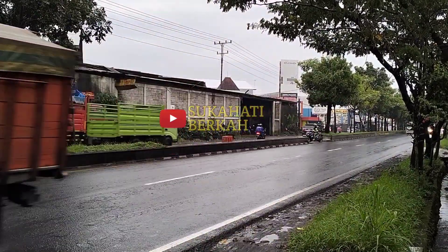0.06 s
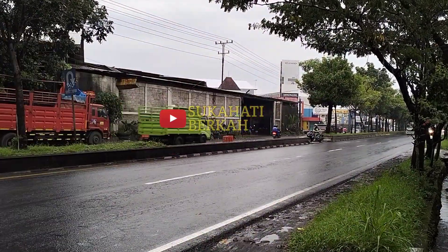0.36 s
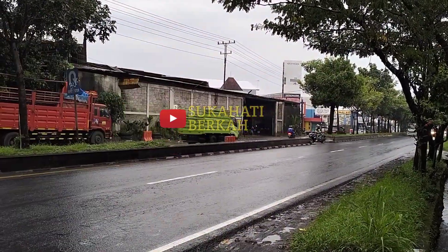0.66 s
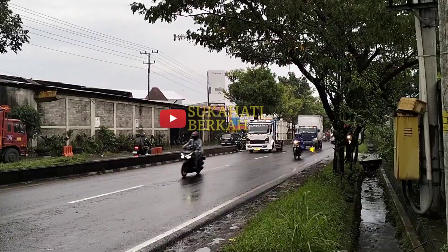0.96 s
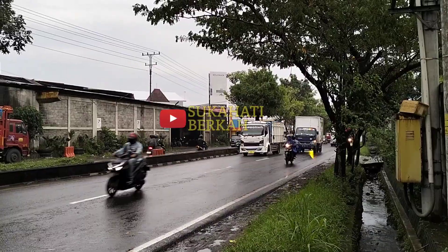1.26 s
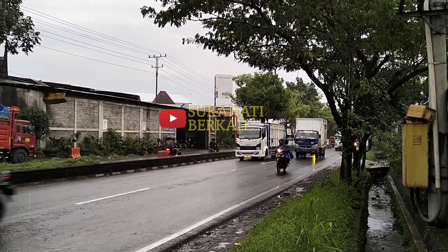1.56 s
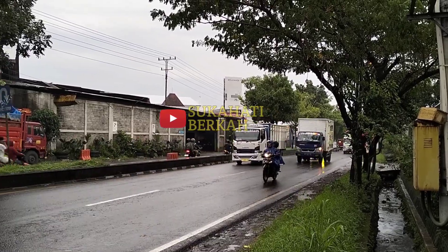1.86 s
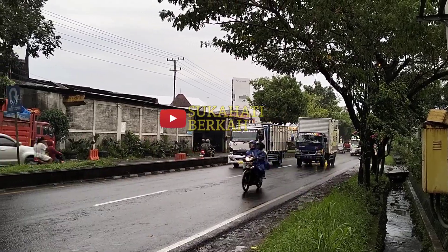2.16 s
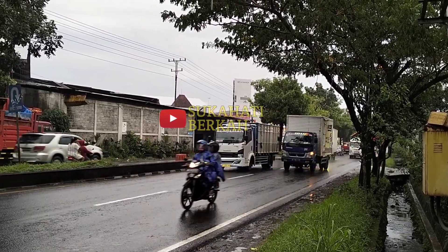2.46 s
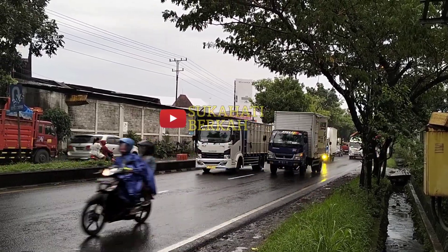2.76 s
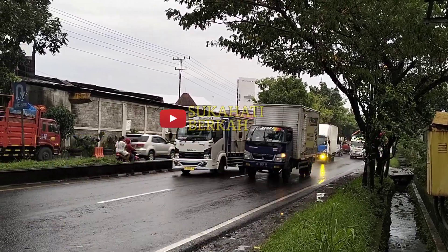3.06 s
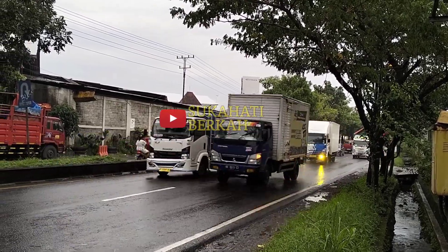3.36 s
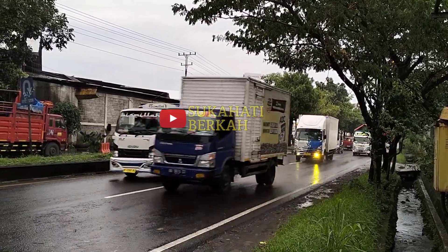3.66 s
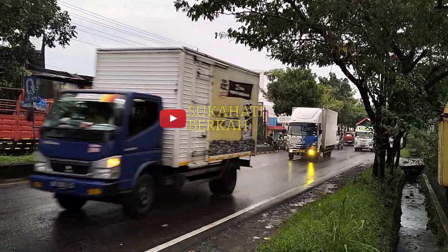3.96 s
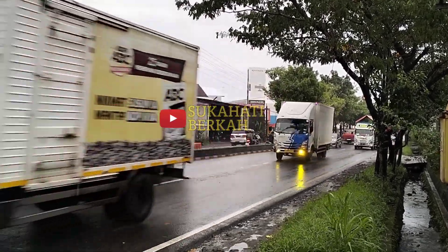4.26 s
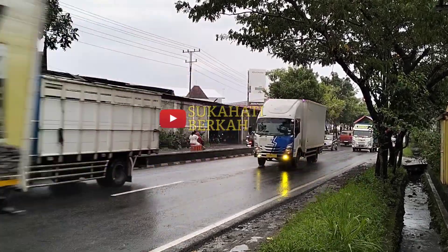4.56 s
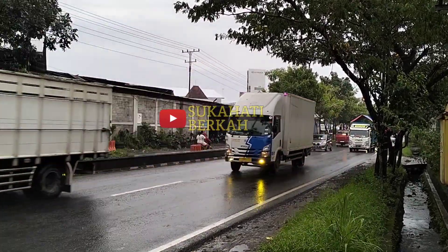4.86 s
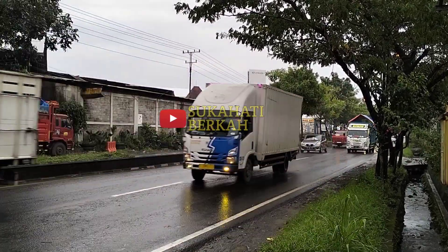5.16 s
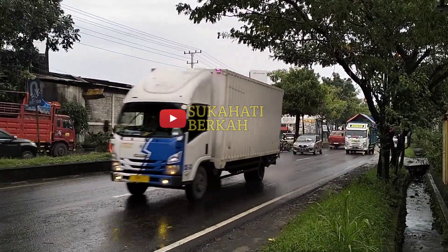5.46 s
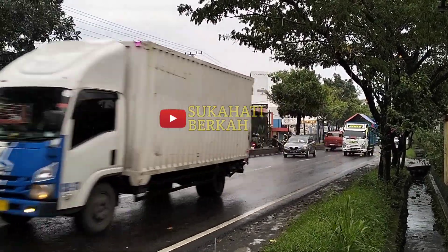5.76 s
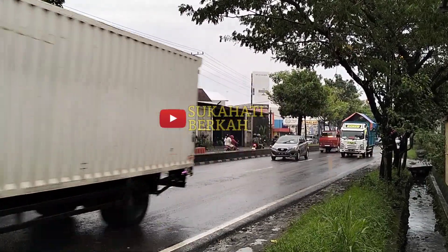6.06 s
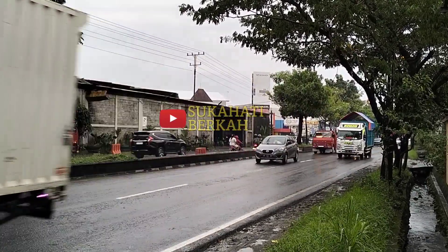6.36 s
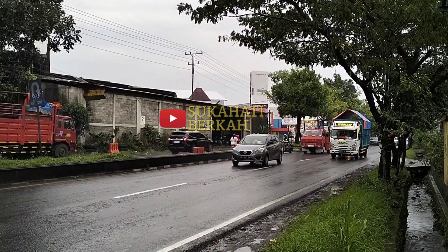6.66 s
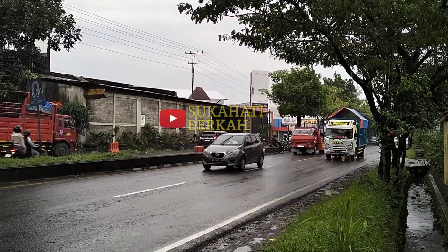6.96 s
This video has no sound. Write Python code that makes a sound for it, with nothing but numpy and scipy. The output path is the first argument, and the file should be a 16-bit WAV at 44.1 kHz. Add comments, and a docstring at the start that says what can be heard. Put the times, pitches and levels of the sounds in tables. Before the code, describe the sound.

A diesel truck draws away on a wet road, its engine throbbing under a gear whine and hissing spray. At 0.7 seconds the sound cuts to silence. Traffic returns at 1.2 seconds with a splash and sizzling tyres. Two motorbikes hum past at about 1.6 and 2.6 seconds, each dropping in pitch. Diesel trucks build beneath them and drone by from about 3 to 5 seconds, with engine clatter strongest near 4.1. Tyres rumble and roar, trailing hiss, spray and short puddle splashes. Another truck passes around 6 seconds, with a few soft wheel thuds until 6.5 and low puffs of air near 6.3 and 7. A thin, breathy high whistle, faint at first, grows from about 3.7 seconds, peaks near 6.3 and lasts to the end. Everything is heard close from the roadside, almost in mono, over steady distant traffic.

```python
"""Traffic on a wet road

Diesel trucks, motorbikes and cars pass close by, heard almost in mono from the verge.
Each swells and fades with its distance: first engine drone and tyre roar, then the hiss and spray
of the water it throws up. A thin, breathy whistle grows as the trucks go by.
One truck draws away at the start; half a second of silence separates it from the later traffic."""
import sys
import numpy as np
from scipy import signal
from scipy.fft import rfft, irfft, next_fast_len
from scipy.io import wavfile
from scipy.ndimage import uniform_filter1d, map_coordinates

SR = 44100
rng = np.random.default_rng(int(sys.argv[2]) if len(sys.argv) > 2 else 0)


def dump_mix(stems):
    """Bounce the given channels to the path in sys.argv[1] as a 16-bit WAV at rate SR."""
    frames = np.atleast_2d(stems).T  # one column per channel
    limited = np.clip(frames, -1, 1)  # hard clip at full scale
    pcm = np.round(limited * 32767).astype(np.int16)
    wavfile.write(sys.argv[1], SR, pcm)


N = 313110


def amp(db):
    """Turn decibels into a gain."""
    return 10 ** (np.asarray(db) / 20)


def unit(x):
    """Scale a signal to an average strength (rms) of 1."""
    return x / np.sqrt(np.mean(x ** 2) + 1e-20)


def clock():
    """The time of every sample, in seconds."""
    return np.arange(N) / SR


def curves(rows):
    """Join a table's rows over time: one smooth line for each later column."""
    times, *columns = np.transpose(rows)
    return [np.interp(clock(), times, column) for column in columns]


def along(points, hz):
    """Read a table of (frequency, level) on a log frequency axis."""
    freqs, levels = np.transpose(points)
    return np.interp(np.log(hz + 1), np.log(freqs), levels)


def wobble(rate):
    """A smooth random curve through `rate` new values a second."""
    knots = rng.standard_normal(int(N * rate / SR) + 4)
    at = np.arange(len(knots) * 10) / 10
    return np.interp(clock() * rate, at, map_coordinates(knots, [at], mode="nearest"))


def filtered(x, response):
    """Multiply each frequency in x by response(hz)."""
    size = next_fast_len(N + SR // 2)
    return irfft(rfft(x, size) * response(np.fft.rfftfreq(size, 1 / SR)), size)[..., :N]


def coloured(x, spectrum):
    """Give x the tone colour of a (frequency, level) table, at strength 1."""
    return unit(filtered(x, lambda hz: amp(along(spectrum, hz))))


def rush(spectrum, patchy_db):
    """Turbulent noise, louder and softer in random patches of time and frequency."""
    cells = signal.stft(rng.standard_normal(N), nperseg=512)[2]
    patches = uniform_filter1d(rng.standard_normal(cells.shape), size=6, axis=0)
    patches = unit(uniform_filter1d(patches, size=12, axis=1))
    noise = signal.istft(cells * amp(patchy_db * patches), nperseg=512)[1][:N]
    return coloured(noise, spectrum)


def water(spectrum, drops_per_s, drops_db, patchy_db):
    """A mist of noise with the ticks of single droplets in it."""
    ticks = (rng.random(N) < drops_per_s / SR) * rng.standard_normal(N)
    return unit(rush(spectrum, patchy_db) + amp(drops_db) * coloured(ticks, spectrum))


def drone(motion, harmonics, jitter, flutter_db):
    """Tones tied to one unevenly turning shaft; returns the sound and the shaft's phase."""
    hz, gain = motion
    phase = 2 * np.pi * np.cumsum(hz * (1 + jitter * wobble(25))) / SR
    tones = sum(amp(db + flutter_db * wobble(11)) * np.sin(multiple * phase + 2 * np.pi * rng.random())
                for multiple, db in harmonics)
    return np.sqrt(2) * gain * tones, phase


def knock(phase, depth):
    """A gain that peaks once a cycle, like an engine firing."""
    return unit(np.exp(depth * np.cos(phase)))


def nearness(at_s, half_s):
    """Gain of something going by: 1 when nearest at at_s, a half at half_s before or after."""
    return 1 / (1 + ((clock() - at_s) / half_s) ** 2)


def swell(at_s, half_s):
    """Gain of a brief bell-shaped surge."""
    return np.exp(-((clock() - at_s) / half_s) ** 2)


def power_sum(gains):
    """Joint gain of unrelated sounds: their powers add."""
    return np.sqrt(sum(gain ** 2 for gain in gains))


def running(track, fade_db_per_s=90):
    """Pitch and gain of an engine that follows its table and fades before and after it."""
    hz, db = curves(track)
    outside_s = np.abs(clock() - np.clip(clock(), track[0][0], track[-1][0]))
    return hz, amp(db - fade_db_per_s * outside_s)


def passing(at_s, half_s, db, hz, fall):
    """Pitch and gain of a tone going by: it slides from the share `fall` above hz to as far below."""
    return hz * (1 - fall * np.tanh((clock() - at_s) / half_s)), amp(db) * nearness(at_s, half_s)


# wheels bumping over the road, and air pushed at the listener: t/s, level/dB, half length/s
WHEEL_BUMPS = [(6.03, -31, .04), (6.14, -31, .03), (6.275, -28.5, 0.018), (6.43, -28.5, 0.061)]
AIR_GUSTS = [(6.28, -29.5, .06), (6.96, -31.5, .04)]
# their tone colours: f/Hz, level/dB
BUMP_TONE = [(30, -20.5), (60, 2), (130, 5.5), (260, 2), (420, -7), (700, -30)]
GUST_TONE = [(8, -24.5), (20, -1.5), (35, 0), (70, -17.5), (300, -70)]


def thuds(blows, tone):
    """Soft blows, each a short swell of deep noise."""
    gain = sum(amp(db) * swell(at_s, half_s) for at_s, db, half_s in blows)
    return gain * coloured(rng.standard_normal(N), tone)


# brief hums: nearest t/s, half passing time/s, level/dB, f/Hz
HUMS = [(1.94, 0.099, -22, 140), (1.95, .3, -40, 487.5), (2.05, 0.29, -27.5, 101.9),
        (2.419, 0.19, -27, 159.3), (3.25, 0.29, -28.5, 167.9), (4.5, 0.24, -34, 413),
        (4.81, .12, -30.5, 219.2), (5.68, .2, -32, 56), (5.85, .45, -37, 409.8), (5.85, 0.43, -39, 345.4)]


def running_gear():
    """Axles, treads, pipes and passing engines each hum for a moment as they go by."""
    return sum(drone(passing(*hum, fall=.006), [(1, 0)], jitter=.022, flutter_db=3)[0] for hum in HUMS)


def breathy_tone(pitch_hz, width_hz):
    """A resonance blown by rough air: the wider it is, the faster its strength and phase drift."""
    pole = np.exp(-2 * np.pi / 64)
    slow_noises = signal.lfilter([1], np.poly([pole] * 3), rng.standard_normal((2, N)))
    read_at = np.arange(1, N + 1) * width_hz / SR * 64
    cos_gain, sin_gain = (unit(np.interp(read_at, np.arange(N), noise)) for noise in slow_noises)
    phase = 2 * np.pi * np.cumsum(pitch_hz) / SR
    return cos_gain * np.cos(phase) + sin_gain * np.sin(phase)


# the whistle's path: t/s, f/Hz, level/dB
WHISTLE = [(1.2, 6554, -42), (2.2, 6500, -43), (2.6, 6160, -37), (3.45, 6197, -38), (3.68, 6560, -30),
           (3.95, 6750, -27), (4.2, 7260, -25), (4.52, 7400, -25.5), (4.86, 6884, -26), (5.6, 6900, -22),
           (5.85, 6890, -18), (6.15, 6930, -18), (6.3, 6950, -15), (6.5, 6930, -17), (6.62, 6800, -20.5),
           (6.85, 6550, -19.5), (7.1, 6710, -21)]
# its parts: pitch offset/Hz, half width/Hz, level/dB at reference_db, dB gained per dB of the path
WHISTLE_AIR = (-60, 470, -26, 1.0)
WHISTLE_CORE = (110, 230, -29.5, 0.9)
WHISTLE_OCTAVE = (260, 620, -37.5, 1.35)


def whistle(reference_db=-24, flutter_db=0.6):
    """A thin whistle, perhaps from a truck's exhaust pipe: a sharp core and its octave in airy noise."""
    hz, db = curves(WHISTLE)
    hz = hz * (1 + .003 * wobble(22))
    parts = [(hz, WHISTLE_AIR), (hz, WHISTLE_CORE), (2 * hz, WHISTLE_OCTAVE)]
    tone = 0
    for pitch_hz, (offset_hz, width_hz, part_db, growth) in parts:
        tone += amp(part_db + growth * (db - reference_db)) * breathy_tone(pitch_hz + offset_hz, width_hz)
    return amp(flutter_db * wobble(60)) * tone


# the first truck's wheels: t/s, roar level/dB, spray level/dB, water fan level/dB
LEAVING_LEVELS = [(0, -19, -20, -35), (.45, -20.5, -20.5, -26.5), (.72, -21.5, -21, -28)]
# tone colours of those three: f/Hz, level/dB
LEAVING_ROAR = [(20, -16), (45, -4), (80, 1), (150, 2), (260, -3.5), (310, -8), (410, -3.5), (530, -11),
                (680, -7.5), (800, -11), (1000, -6.5), (1700, -10), (2600, -15), (5000, -47.5)]
LEAVING_SPRAY = [(900, -43), (1600, -11), (2100, 0.5), (3100, 1.5), (4000, -5), (5500, -10.5), (7000, -12),
                 (9000, -18), (11000, -14.5), (13300, -11), (14500, -14), (15700, -23.5)]
WATER_FAN = [(1500, -30.5), (2500, -12), (3150, 6), (3800, -2.5), (5000, -22), (8000, -41.5)]
# its engine: t/s, f/Hz, level/dB
LEAVING_ENGINE = [(0, 64.75, -29), (.3, 63.55, -29), (.72, 62.3, -27.5)]
# its gear whine: multiple of the pitch, level/dB
GEAR_HARMONICS = [(1, 1), (3, -10), (4, -16), (5, -11.5), (9, -4.5)]


def leaving_truck(gear_hz=237, gear_db=-27.5):
    """A truck draws away: its engine throbs, its gears whine and water fans out behind its wheels."""
    roar_db, spray_db, fan_db = curves(LEAVING_LEVELS)
    engine, phase = drone(running(LEAVING_ENGINE), [(1, -1), (2, -5)], jitter=.0073, flutter_db=2)
    gear_gain = amp(gear_db) * swell(at_s=0.2, half_s=0.43)
    gears, _ = drone((gear_hz, gear_gain), GEAR_HARMONICS, jitter=.004, flutter_db=3.5)
    roar = amp(roar_db) * rush(LEAVING_ROAR, patchy_db=0.1) * knock(phase, depth=0.14)
    spray = amp(spray_db) * water(LEAVING_SPRAY, drops_per_s=2000, drops_db=-6.5, patchy_db=1)
    fan = amp(fan_db) * rush(WATER_FAN, patchy_db=3)
    return engine + gears + roar + spray + fan


# two bikes, and one bike's exhaust: nearest t/s, half passing time/s, level/dB, f/Hz, pitch fall/share
MOTORBIKES = [(1.57, .2, -21.5, 115.3, .11), (2.62, .45, -27, 124.4, .14)]
BIKE_EXHAUST = (1.63, 0.7, -36.5, 95, 0.2)
# the tones in each: multiple of the pitch, level/dB
BIKE_HARMONICS = [(1, 2.5), (2, -18), (3, -20.5), (4, -23.5)]
EXHAUST_HARMONICS = [(1, 2), (2, -2), (3, -11), (4, 0.5), (5, -2.5), (6, -16.5)]


def motorbikes():
    """One-cylinder four-stroke engines hum in puffs, one every fourth cycle, over an exhaust's drone."""
    sound, _ = drone(passing(*BIKE_EXHAUST), EXHAUST_HARMONICS, jitter=.014, flutter_db=4.5)
    for bike in MOTORBIKES:
        hum, phase = drone(passing(*bike), BIKE_HARMONICS, jitter=.0251, flutter_db=1.8)
        sound += hum * knock(phase / 4, depth=0.74)
    return sound


# where the box truck's engine block rings: f/Hz, width/Hz, level/dB
BLOCK_RINGS = [(640, 150, -4.5), (726, 39, -0.5), (963, 45, -7)]


def block_clatter(firing_phase, level_db=-27.5):
    """Each diesel firing rattles the engine block and makes it ring."""
    def rings(hz):
        return sum((-1) ** k * amp(db) * 1j * hz * width / (ring_hz ** 2 - hz ** 2 + 1j * hz * width)
                   for k, (ring_hz, width, db) in enumerate(BLOCK_RINGS))
    blows = rng.standard_normal(N) * knock(firing_phase, depth=0.52)
    return amp(level_db) * nearness(at_s=4.11, half_s=0.48) * unit(filtered(blows, rings))


# three truck engines: t/s, f/Hz, level/dB
BOX_TRUCK = [(1.2, 46.8, -24), (1.7, 46.5, -22.5), (1.92, 47.9, -36), (2.48, 50.5, -23),
             (2.85, 52.3, -27.5), (3.42, 54.07, -20.5), (3.65, 55.26, -24.5), (4.33, 59.13, -18),
             (4.8, 56.2, -26.5)]
OPEN_TRUCK = [(1.75, 123, -28), (2.15, 125.7, -27), (2.52, 131.5, -22), (2.85, 134.5, -33),
              (3.15, 136.5, -26), (3.66, 138.6, -20), (3.92, 135, -33.5), (5.6, 132, -36)]
LAST_TRUCK = [(5.72, 131.8, -38), (5.98, 131.9, -27), (6.45, 132, -29), (6.88, 131.2, -33), (7.1, 130, -43)]
# the tones of the box truck and of the other two: multiple of the pitch, level/dB
BOX_HARMONICS = [(1, -0.5), (2, -7), (3, -12.5), (4, -19.5)]
TRUCK_HARMONICS = [(.5, -7.5), (1, -1.5), (1.5, -27.5), (2, -16.5), (3, -21)]


def diesels():
    """Three diesel engines drone by; returns their sound and the phases of the first two."""
    box, box_phase = drone(running(BOX_TRUCK), BOX_HARMONICS, jitter=.0143, flutter_db=2.1)
    open_truck, open_phase = drone(running(OPEN_TRUCK), TRUCK_HARMONICS, jitter=.0136, flutter_db=2.5)
    last, _ = drone(running(LAST_TRUCK), TRUCK_HARMONICS, jitter=.01, flutter_db=1.5)
    return box + open_truck + last + block_clatter(2 * box_phase), box_phase, open_phase


# steady traffic farther off: level/dB of rumble, roar, hiss, splash, spray
FAR_TRAFFIC = (-39, -38, -25.5, -34.5, -39)
# bikes, cars and trucks: nearest t/s, half passing time/s, level/dB of rumble, roar, hiss, spray
VEHICLES = [ (1.2, 0.34, -23, -26, -23.5, -31), (1.78, 0.68, -26.5, -25.5, -23.5, -33),
            (3.45, 0.98, -25.5, -26.5, -29, -29.5), (4.33, 0.5, -25.5, -25, -30.5, -42),
            (4.83, .7, -28.5, -28, -24.5, -28), (5.65, 0.56, -31, -30, -29, -32),
            (6.09, 0.5, -30, -30, -30, -29), ]
# wheels running through puddles: t/s, half length/s, level/dB of hiss, splash, spray
PUDDLES = [(1.3, 0.054, -21, -22, -26), (1.48, 0.14, -31, -26.5, -42), (2.2, .11, -27.5, -44, -36),
           (2.307, .05, -29, -33, -42), (3.857, 0.22, -43, -31, -31.5), (4.73, .06, -24, -34, -42),
           (5.084, 0.049, -26, -42, -37), (5.28, .05, -27.5, -41, -36), (5.518, .05, -25, -38, -41),
           (6.909, .15, -40, -39, -29)]


def road_gains(wake_lag_s=0.29, splash_vs_hiss_db=-4.5):
    """How loud rumble, roar, hiss, splash and spray are; the wet sounds trail behind each vehicle."""
    sources = [amp(FAR_TRAFFIC)[:, None]]
    for at_s, half_s, rumble_db, roar_db, hiss_db, spray_db in VEHICLES:
        body, wake = nearness(at_s, half_s), nearness(at_s + wake_lag_s, half_s)
        levels_db = [rumble_db, roar_db, hiss_db, hiss_db + splash_vs_hiss_db, spray_db]
        sources.append(amp(levels_db)[:, None] * [body, body, wake, wake, wake])
    rumble, roar, *wet = power_sum(sources)
    puddles = [amp(levels_db)[:, None] * swell(at_s, half_s) for at_s, half_s, *levels_db in PUDDLES]
    return (rumble, roar, *power_sum([np.array(wet)] + puddles))


# tone colours of flung water: f/Hz, level/dB
BIKE_SIZZLE = [(600, -24), (1100, -3), (1550, 1), (2100, -10.5), (3500, -32)]
SPLASH = [(2000, -40.5), (3300, -3.5), (4200, 1), (5500, -1.5), (6500, -0.5), (7500, -8.5), (9000, -22.5),
          (12000, -29)]
SPRAY = [(4000, -18.5), (7000, 2.5), (8500, -3.5), (10000, -5.5), (11500, -1.5), (13300, 2), (14300, -8),
         (15700, -8)]


def flung_water(splash_gain, spray_gain, sizzle_db=-28):
    """Treads fling water in uneven spurts: coarse splash, fine spray and the sizzle of thin bike tyres."""
    spurts = amp(0.45 * wobble(70))
    sizzle = amp(sizzle_db) * nearness(at_s=1.75, half_s=0.85) * rush(BIKE_SIZZLE, patchy_db=1.1)
    splash = splash_gain * water(SPLASH, drops_per_s=1500, drops_db=-7, patchy_db=0.1)
    spray = spray_gain * amp(.33 * wobble(14)) * water(SPRAY, drops_per_s=1800, drops_db=-6, patchy_db=.9)
    return spurts * (sizzle + splash + spray)


# tone colours of rolling on a wet road: f/Hz, level/dB
RUMBLE = [(18, -10.5), (32, -8), (48, -0.5), (66, -1.5), (82, -6), (105, -3.5), (140, 3), (180, -1.5),
          (240, -5), (320, -8.5), (410, -11), (520, -22), (900, -41.5)]
ROAR = [(200, -29.5), (340, -5.5), (440, 1), (530, -6.5), (620, 0.5), (720, 0.5), (810, -2.5), (1000, 1.5),
        (1400, -2.5), (1900, -5), (3000, -17.5), (6000, -39)]
HISS = [(500, -24), (1000, -11), (1600, -4.5), (2100, -0.5), (3000, 0), (3600, -6), (4500, -15.5),
        (7000, -43)]


def tyres(rumble_gain, roar_gain, hiss_gain, box_phase, open_phase):
    """Rolling tyres rumble, roar and hiss; the firing of two diesels roughens the noise."""
    rumble = rumble_gain * amp(.8 * wobble(12)) * rush(RUMBLE, patchy_db=.4) * knock(box_phase, depth=.17)
    roar = roar_gain * amp(.23 * wobble(22)) * rush(ROAR, patchy_db=.3) * knock(2 * box_phase, depth=.15)
    hiss = hiss_gain * amp(.3 * wobble(30)) * water(HISS, drops_per_s=1100, drops_db=-11, patchy_db=.9)
    return rumble + roar + hiss * knock(open_phase / 2, depth=.05)


# the left-right difference, relative to the shared sound: f/Hz, level/dB
STEREO_SIDE = [(60, -36.5), (200, -46.5), (380, -31), (700, -19), (1100, -32.5), (2000, -81.5),
               (15000, -68.5)]


def near_mono(mid):
    """Left and right hear the same sound, with a slight shift of phase between them."""
    side = filtered(mid, lambda hz: 1j * amp(along(STEREO_SIDE, hz)))
    return np.array([mid + side, mid - side])


def scene(gap_start_s=0.7143, gap_end_s=1.2353):
    """One truck leaves, there is a silent gap, then a stream of traffic passes."""
    rumble, roar, hiss, splash, spray = road_gains()
    blows = thuds(WHEEL_BUMPS, BUMP_TONE) + thuds(AIR_GUSTS, GUST_TONE)
    engines, box_phase, open_phase = diesels()
    road = flung_water(splash, spray) + tyres(rumble, roar, hiss, box_phase, open_phase)
    traffic = blows + running_gear() + whistle() + motorbikes() + engines + road
    return near_mono(leaving_truck() * (clock() < gap_start_s) + traffic * (clock() >= gap_end_s))


def record(dry, top_hz=15750):
    """The very highest treble is cut off steeply."""
    return filtered(dry, lambda hz: (1 - np.tanh((hz - top_hz) / 40)) / 2)


dry = scene()
out = record(dry)
dump_mix(out)
```